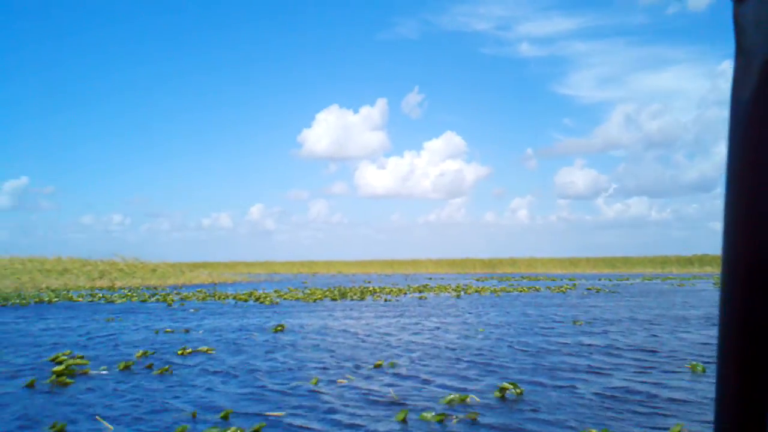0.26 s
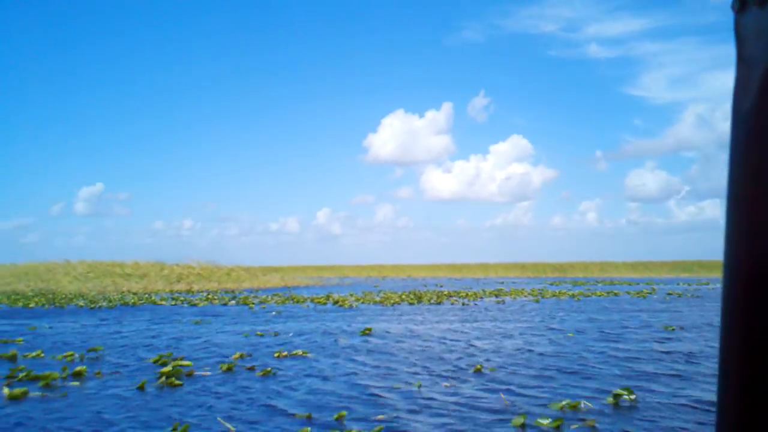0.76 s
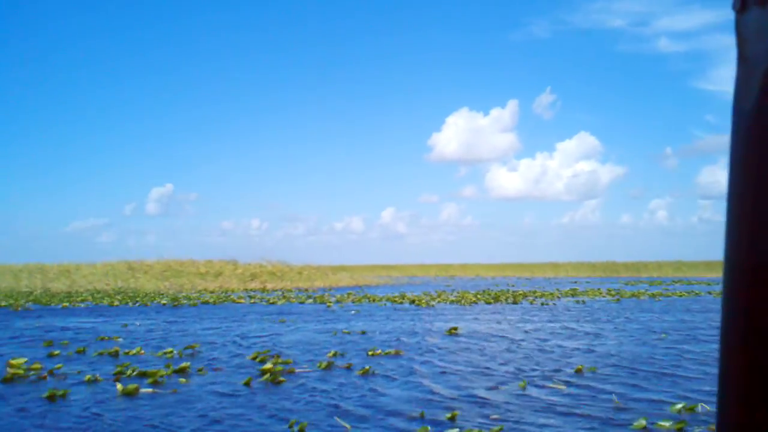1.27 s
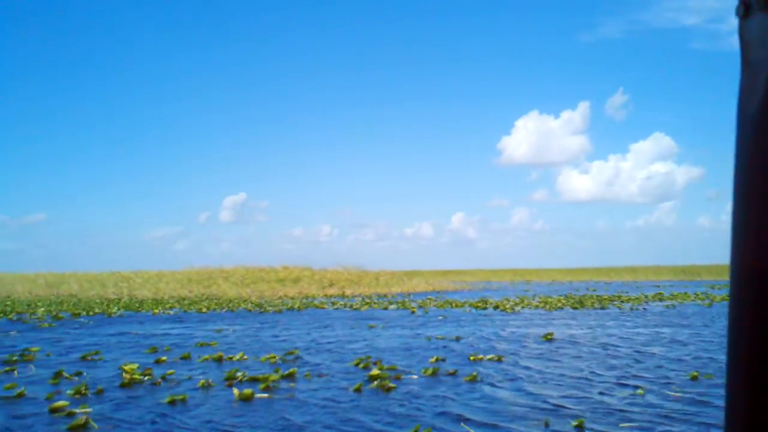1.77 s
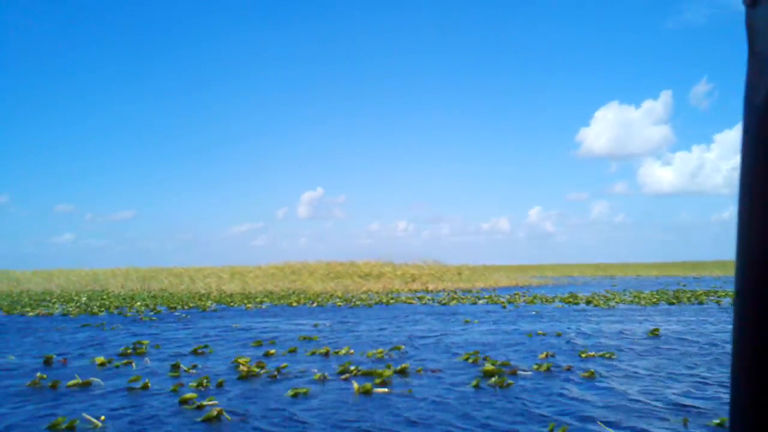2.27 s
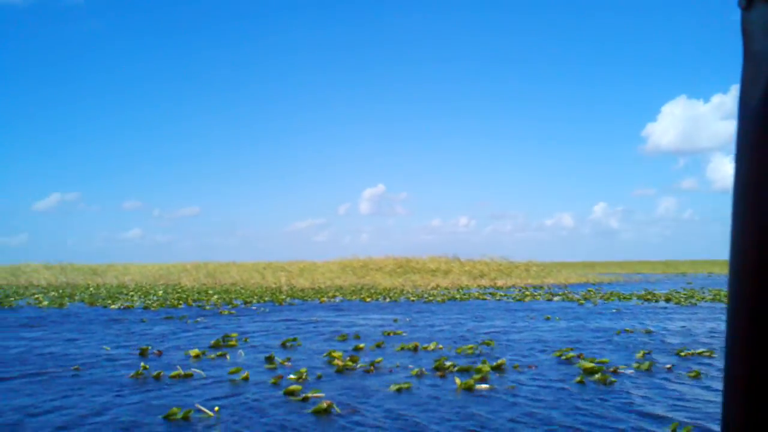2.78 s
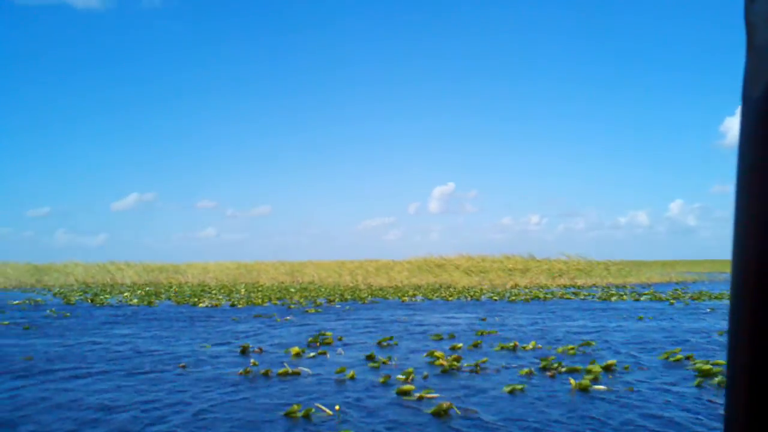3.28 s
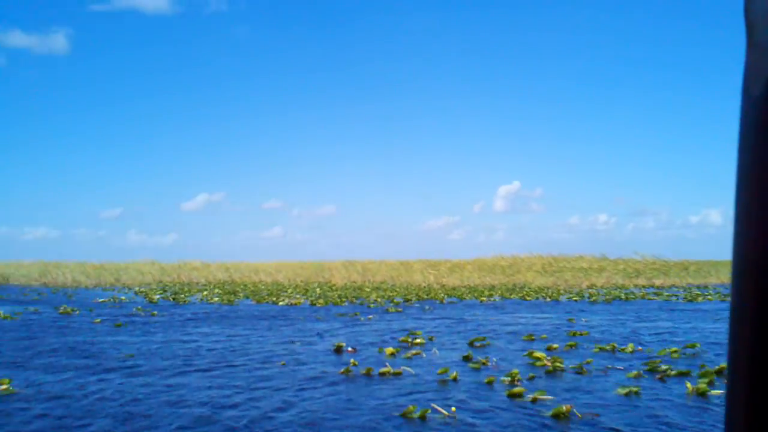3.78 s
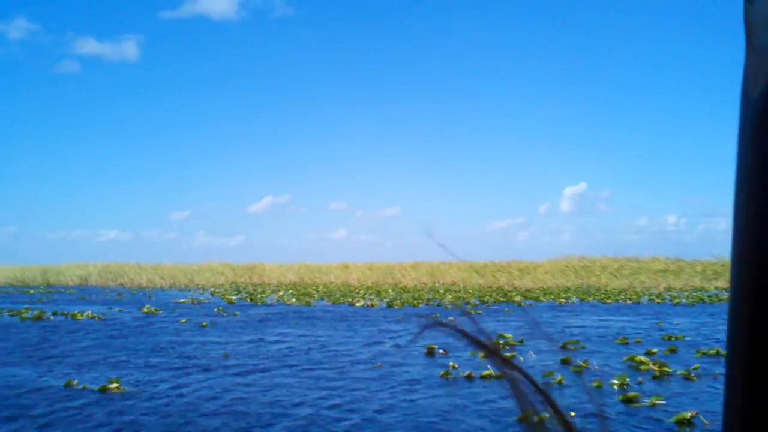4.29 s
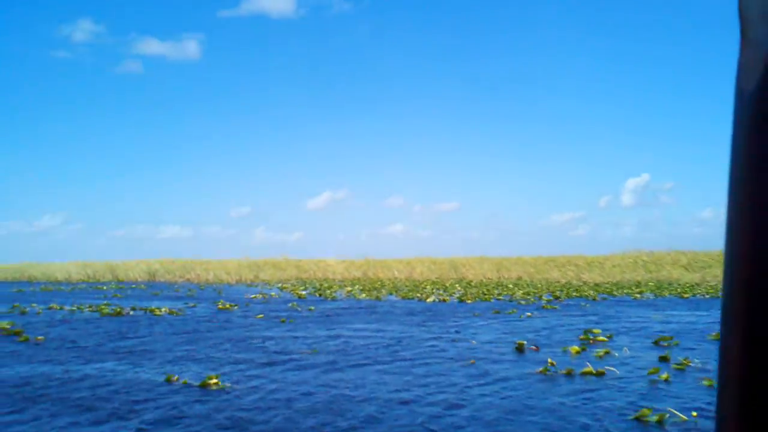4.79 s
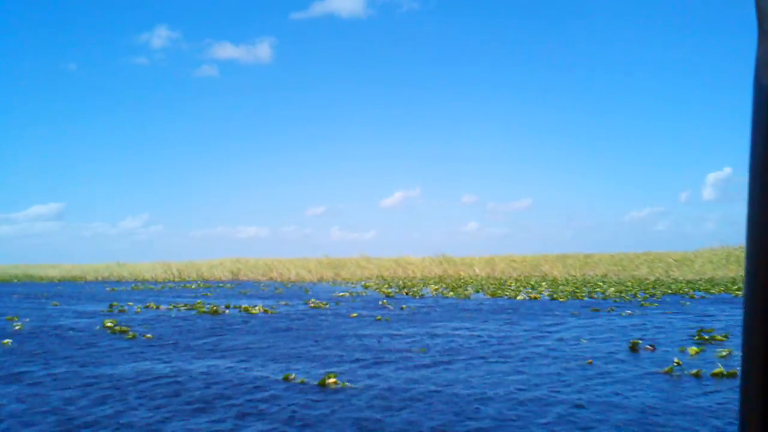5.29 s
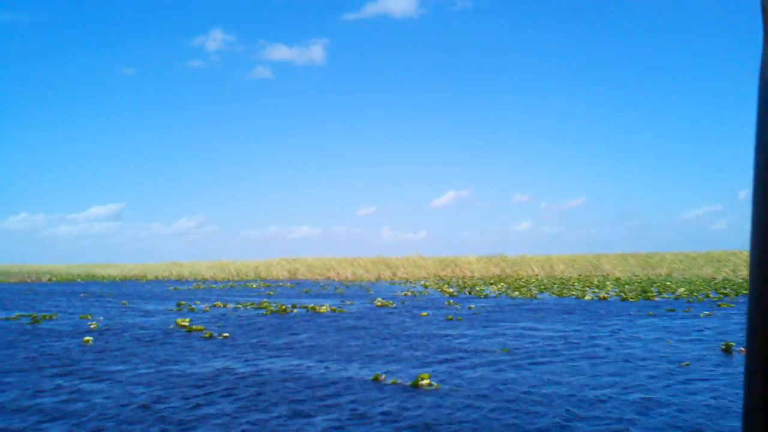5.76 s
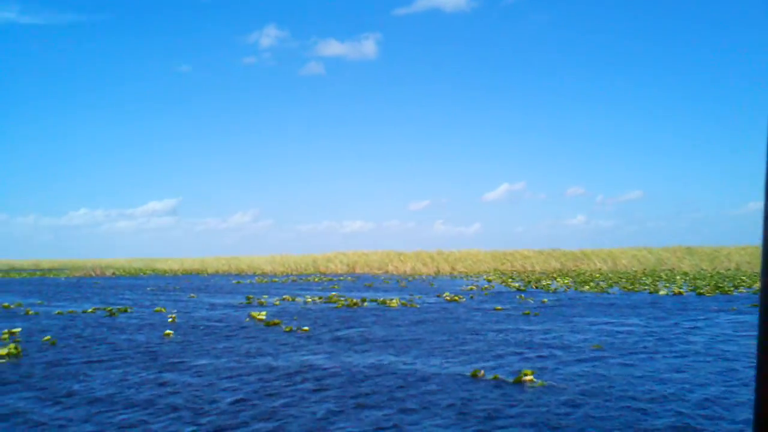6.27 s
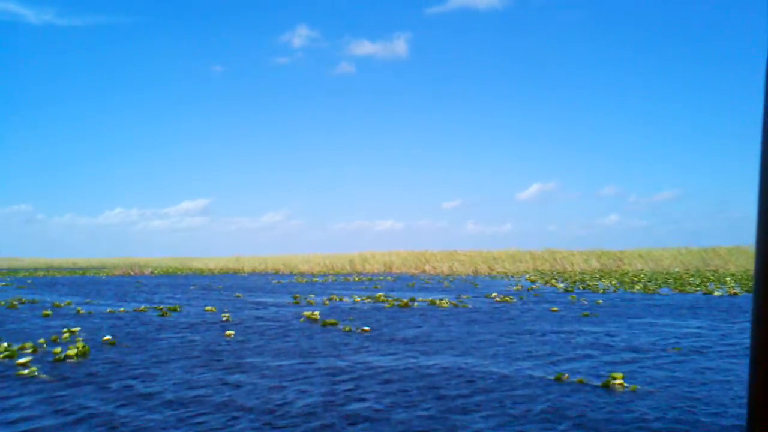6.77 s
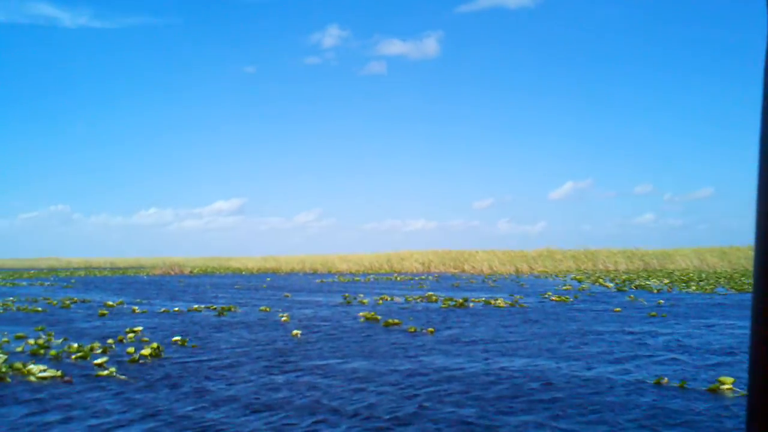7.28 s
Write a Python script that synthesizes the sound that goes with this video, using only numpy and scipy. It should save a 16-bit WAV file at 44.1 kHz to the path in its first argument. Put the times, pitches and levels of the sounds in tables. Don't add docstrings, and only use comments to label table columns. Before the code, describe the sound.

On board an airboat running fast across open marsh, the propeller and engine make a continuous wide droning roar. Blades beat with a raspy exhaust flutter, strongest in the first second, then smoother. Water rushes beneath a rumbling hull with a fine spray hiss. Irregular wind gusts thump the handheld stereo microphone, first on both sides, later mostly on the right.

```python
import sys
import numpy as np
from scipy import signal
from scipy.fft import rfft, irfft, next_fast_len
from scipy.io import wavfile
from scipy.ndimage import uniform_filter1d

SR = 44100
rng = np.random.default_rng(int(sys.argv[2]) if len(sys.argv) > 2 else 0)


def volts_from_decibels(level):
    exponent = np.asarray(level, float) / 20
    return 10 ** exponent


def output_pcm(signal):
    pcm = np.clip(np.atleast_2d(signal).T, -1, 1) * 32767
    wavfile.write(sys.argv[1], SR, np.round(pcm).astype(np.int16))


N = 332514

# (centre [s], half length [s], level [dB], port [0 left, 1 right])
GUSTS = [(0.198, 0.046, -25, 0), (0.766, 0.079, -16.5, 0), (1.59, 0.034, -17, 0), (1.865, 0.15, -18, 0),
         (2.3, 0.13, -24, 0), (2.626, .1, -21, 0), (3.998, .08, -36, 0), (6.522, .1, -27, 0),
         (7.385, 0.064, -20, 0), (0.733, 0.065, -19.5, 1), (1.156, 0.14, -18.5, 1), (1.41, 0.085, -21, 1),
         (1.605, 0.064, -32, 1), (2.395, 0.26, -22, 1), (4.006, .1, -32, 1), (5.637, 0.17, -18.5, 1),
         (5.891, 0.11, -13.5, 1), (6.5, 0.25, -18.5, 1), (7.02, 0.15, -20.5, 1), (7.41, 0.2, -22, 1)]
# (time [s], thump level [dB], snap level [dB], port [0 left, 1 right])
EDDY_HITS = [(0.092, -6, -34, 0), (0.293, -9, -27, 0), (0.353, -4, -33, 0), (0.726, -7, -34, 0),
             (0.748, -5, -20, 1), (1.214, -2, -17.5, 1), (1.253, -2, -15.5, 1), (1.259, 1, -22, 1),
             (1.388, -10, -29, 0), (1.445, -7, -30, 1), (1.564, -4, -24, 0), (1.914, -3.5, -19, 0),
             (1.987, -11, -21.5, 0), (2.209, -4.5, -26, 1), (2.316, -4.5, -28, 0), (2.588, -4.5, -28, 0),
             (3.896, -3.5, -24, 0), (4.434, -14, -22, 0), (4.608, 0.5, -35, 1), (5.303, -10, -21, 1),
             (5.548, -4, -23, 1), (5.639, -0.5, -29, 1), (2.018, -23, -41, 0), (5.948, -19, -25, 1),
             (6.325, -3, -19.5, 1), (6.461, -1, -18.5, 1), (7.326, -24, -26, 1), (7.356, -2, -26, 1),
             (7.373, -9, -22.5, 1), (7.498, -6, -32, 1)]
# (frequency [Hz], density [dB per Hz])
WIND_SPECTRUM = [(20, -38), (45, -39), (90, -6.5), (140, 4.5), (260, 1.5), (350, -0.5), (520, -8.5),
                 (700, -11), (1000, -26.5), (1500, -29), (3000, -57), (9000, -110)]
BREEZE_DB, BREEZE_DB_PER_S = [-25, -28], [-.5, -2]
TICK_OVER_WIND_DB, TICK_SPREAD_DB, TICK_SNAP_DB = 9, 4, -24

# (time [s], propeller wash level [dB], spray level [dB])
WASH_AND_SPRAY = [(0, -31, -59), (.3, -27.5, -56.5), (.6, -25.5, -53.5), (.9, -25, -55), (1.2, -25.5, -57),
                  (1.6, -29, -59), (2.4, -26, -59.7), (3, -24.5, -58), (3.6, -20.5, -54.5),
                  (4.5, -20.5, -54), (5.4, -18.5, -49.5), (5.7, -23, -51), (6.3, -20, -50.5),
                  (6.9, -23, -52.5), (7.2, -20.5, -51.5), (7.54, -25, -53.5)]
# (frequency [Hz], density [dB per Hz])
ROAR_SPECTRUM = [(40, -60), (120, -15), (200, 5), (260, 1), (350, 1.5), (520, -3), (700, -9.5),
                 (1000, -17.5), (1500, -29.5), (3000, -46), (9000, -110)]
RUMBLE_SPECTRUM = [(18, -32), (30, -37), (50, -55), (65, -4), (100, -0.5), (140, 7.5), (200, 4.5),
                   (300, -13.5), (600, -72), (3000, -110)]
RUSH_SPECTRUM = [(300, -8), (700, 5), (1400, -1), (1900, -6), (2300, -2.5), (3000, -9.5), (3700, -9.5),
                 (4500, -15), (5300, -21), (7000, -22), (14000, -62)]
SPRAY_SPECTRUM = [(2100, -9), (4600, -5), (6100, -4.5), (8700, -1), (10600, -4), (13100, -6)]
# (frequency [Hz], shared part [0 to 1])
PORT_LIKENESS = [(50, 1), (400, 0.96), (1000, 0.46), (1600, 0.58), (2500, 0.053), (4000, 0.072)]
LAG_S = .00016
RUSH_DB, RUSH_FOLLOWS, RUSH_FADE_DB_PER_S, SPRAY_MEAN_DB = -42, 0.62, -0.7856, -53.5
HULL_DB, HULL_LOUDEST_S, HULL_SAG_DB_PER_S2 = -32.5, 3.25, -0.5

# (time [s], blade passes [per s])
BLADE_RATE = [
    (0, 71.5),
    (.9, 73.6),
    (1.8, 75.6),
    (2.5, 76.7),
    (3.4, 76.8),
    (5, 77.3),
    (5.55, 79),
    (6.2, 77.3),
    (7.54, 77),
]
# (centre [s], half length [s], multiple of the blade rate [number], level [dB])
BLADE_LOBES = [(0.71, 0.56, 2, -28.5), (2.25, 0.62, 2, -22), (1.52, 0.42, 2, -37.5), (3.4, 0.56, 2, -26.5),
               (4.4, 0.66, 2, -28.5), (5.5, 0.14, 2, -21.5), (3.05, 0.83, 3, -28), (4.6, 0.49, 3, -27.5),
               (6.2, 0.13, 3, -24), (1.18, 0.43, 4, -35), (4.1, 0.31, 4, -31.5), (5.003, 0.24, 4, -25.5),
               (6.05, 0.36, 4, -32)]
# (multiple of the blade rate [number], level [dB])
EXHAUST_TONES = [(3.25, 5), (5, 1.5), (8, -10), (9, -9.5), (10, -23), (12, -31), (13, -18)]
# (frequency [Hz], width [Hz], level [dB])
EXHAUST_RESONANCES = [(711, 150, -3), (930, 200, -5), (1415, 205, -9.5), (1960, 480, -12.5),
                      (2704, 110, -18), (3650, 1180, -25.5)]
# (centre [s], half length [s], level [dB])
SLAP_LOBE = (0.5, .19, -29)
EXHAUST_LOBE = (.56, .36, -31)
HISS_UNDER_SLAP_DB, SLAP_UNDER_WASH_DB, EXHAUST_AWAY_DB = -24, -22, -56

# (frequency [Hz], from left [gain], from right [gain])
PORT_FEED = [(4100, 1, 1), (4350, .15, .45), (14000, .12, .35)]
FEED_S = 1 / 2582
# (frequency [Hz], centre level [dB], side level [dB])
BAND_FLOOR = [(800, -50, -30), (1900, -17, -19), (2750, -12.5, -16), (4000, -14, -11), (4500, -4.6, -7),
              (9000, -6, -6.5), (14000, -3, -4.5)]
EDGE_HZ = 14020
LIMIT = .85


def evened(x):
    return x / np.sqrt(np.mean(x ** 2) + 1e-20)


def read(points, hz):
    f, *values = np.transpose(points)
    return np.squeeze([np.interp(np.log(hz + 1), np.log(f + 1), v) for v in values])


def curves(rows):
    s, *columns = np.transpose(rows)
    return [np.interp(np.arange(N) / SR, s, c) for c in columns]


def lobe(centre, half, db):
    return volts_from_decibels(db) * np.exp(-((np.arange(N) / SR - centre) / half) ** 2)


def wander(hz, channels):
    step = 64
    lowpass = signal.butter(2, hz, fs=SR / step)
    slow = signal.lfilter(*lowpass, rng.standard_normal((channels, N // step + 2)))
    return evened(np.array([np.interp(np.arange(N) / step, np.arange(len(v)), v) for v in slow]))


def resonate(x, hz, width):
    return signal.lfilter(*signal.iirpeak(hz, hz / width, SR), x)


def noise(spectrum, alike, patchy_db):
    frames, hz = N // 256 + 5, np.fft.rfftfreq(1024, 1 / SR)
    a, b, c, d, patches = rng.standard_normal((frames, 513, 5)).T
    patches = uniform_filter1d(patches, size=14, axis=0)
    patches = evened(uniform_filter1d(patches, size=12, axis=1))
    same = np.clip(alike * read(PORT_LIKENESS, hz), 0, 1)[:, None]
    right = a + 1j * b
    late = np.exp(-2j * np.pi * hz * LAG_S)[:, None]
    left = same * late * right + np.sqrt(1 - same ** 2) * (c + 1j * d)
    z = np.array([left, right])
    z *= volts_from_decibels(read(spectrum, hz)[:, None] + patchy_db * patches)
    return evened(signal.istft(z, nperseg=1024, noverlap=768)[1][:, :N])


def wind():
    lumps_db = 2.8 * wander(35, channels=2) + 2.3 * wander(90, channels=2)
    turbulence = evened(volts_from_decibels(lumps_db) * noise(WIND_SPECTRUM, 0, patchy_db=0.96))
    turbulence = signal.lfilter(*signal.butter(2, 55, "high", fs=SR), turbulence)
    power = volts_from_decibels(np.c_[BREEZE_DB] + np.c_[BREEZE_DB_PER_S] * np.arange(N) / SR) ** 2
    for s, half, db, port in GUSTS:
        power[round(port)] += lobe(s, half, db) ** 2
    out = volts_from_decibels(-0.7) * np.sqrt(power) * turbulence

    when, side, strength = rng.random((50, 3)).T
    at = (400 + when * (N - 800)).astype(int)
    port = np.round(side).astype(int)
    tick_db = 10 * np.log10(power[port, at]) + TICK_OVER_WIND_DB + TICK_SPREAD_DB * (2 * strength - 1)
    hits = [*EDDY_HITS, *zip(at / SR, tick_db, tick_db + TICK_SNAP_DB, port)]

    t = np.arange(-400, 400) / SR
    for (s, thump_db, snap_db, port), (phase, size) in zip(hits, rng.random((len(hits), 2))):
        thump_hz = 360 * (.8 + .4 * size)
        thump = np.exp(-(t / .0024) ** 2) * np.cos(2 * np.pi * (thump_hz * t + phase))
        sweep = 950 * t - 60000 * t ** 2
        snap = np.exp(-(t / 0.0022) ** 2) * np.cos(2 * np.pi * (sweep + size))
        front = np.exp(-((t + 0.00022) / 0.00048) ** 2)
        snap += .5 * front * np.cos(2 * np.pi * (1500 * t + phase))
        at = round(s * SR) - 400
        out[round(port), at:at + 800] += volts_from_decibels(thump_db - 4.0) * thump + volts_from_decibels(snap_db + 1.0) * snap
    return out


def hull_and_wash():
    wash_db, spray_db = curves(WASH_AND_SPRAY)
    t = np.arange(N) / SR
    rush_db = RUSH_DB + RUSH_FOLLOWS * (spray_db - SPRAY_MEAN_DB) + RUSH_FADE_DB_PER_S * t
    hull_db = HULL_DB + HULL_SAG_DB_PER_S2 * (t - HULL_LOUDEST_S) ** 2
    swell = wander(8.9, channels=2)
    wash = volts_from_decibels(wash_db - 2.5 + .6 * swell[0]) * noise(ROAR_SPECTRUM, 1, patchy_db=.8)
    hull = volts_from_decibels(hull_db + 9.5) * noise(RUMBLE_SPECTRUM, 1, patchy_db=-1.3)
    rush = volts_from_decibels(rush_db + 1.5 + 0.37 * swell[1]) * noise(RUSH_SPECTRUM, 0.26, patchy_db=1.37)
    spray = noise(SPRAY_SPECTRUM, 0, patchy_db=1.5)
    mist = signal.filtfilt(*signal.butter(2, 10500, "high", fs=SR), spray)
    spray += (volts_from_decibels(0.74 * (spray_db - spray_db.max())) - 1) * mist
    return wash + hull + rush + volts_from_decibels(spray_db + 0.97 + 0.6 * swell[1]) * spray


def propeller():
    rate = curves(BLADE_RATE)[0] * (1 + 0.0019 * wander(5.06, channels=1)[0])
    turns = np.cumsum(rate) / SR
    waver_db = 1.2 * wander(6, channels=10)

    def tone(multiple):
        return np.cos(2 * np.pi * multiple * turns)

    heard = {k: sum(lobe(s, half, db) for s, half, m, db in BLADE_LOBES if round(m) == k)
             for k in (2, 3, 4)}
    blades = sum(gain * volts_from_decibels(waver_db[k - 2]) * tone(k) for k, gain in heard.items())
    blades += heard[4] * volts_from_decibels(waver_db[9] - 8.5) * tone(7)
    exhaust = sum(volts_from_decibels(db + waver_db[k + 3]) * tone(m) for k, (m, db) in enumerate(EXHAUST_TONES))
    steady = np.sqrt(2) * (blades + (lobe(*EXHAUST_LOBE) + volts_from_decibels(EXHAUST_AWAY_DB)) * exhaust)

    puffs = (0.2 + np.exp(-(turns % 1) / 0.45)) * rng.standard_normal((2, N))
    cycle = np.linspace(0, 1, 1025)
    pulse = evened(sum(np.cos(2 * np.pi * k * cycle) for k in range(6, 32)))
    blow = puffs + 0.099 * np.interp(turns % 1, cycle, pulse)
    slap = evened(sum(volts_from_decibels(db) * resonate(resonate(blow, hz, width), hz, width)
                      for hz, width, db in EXHAUST_RESONANCES))
    hiss = volts_from_decibels(HISS_UNDER_SLAP_DB) * resonate(puffs, 6300, 3500)
    near = lobe(*SLAP_LOBE) + volts_from_decibels(curves(WASH_AND_SPRAY)[0] + SLAP_UNDER_WASH_DB)
    near = near * volts_from_decibels(np.array([[-4], [-1.5]]))
    return np.array([np.roll(steady, round(LAG_S * SR)), steady]) + near * (slap + hiss)


def scene():
    return wind() + hull_and_wash() + propeller()


def widen(ports):
    size = next_fast_len(N + 64)
    hz = np.fft.rfftfreq(size, 1 / SR)
    feed = read(PORT_FEED, hz)
    spectra = rfft(ports, size)
    wide = spectra - feed * np.exp(-2j * np.pi * hz * FEED_S) * spectra[::-1]
    wide /= np.sqrt((1 + feed ** 2) / 2)
    return irfft(wide, size)[:, :N]


def empty_weak_bands(x):
    lead = np.zeros((2, 144))
    pair = np.hstack([lead, [x[0] + x[1], x[0] - x[1]]])
    hz, t, z = signal.stft(pair, SR, nperseg=2048, noverlap=1024)
    band = np.cumsum(hz[1] / np.clip(hz / 14, 86, 690)).astype(int)
    starts = np.flatnonzero(np.diff(band, prepend=-1))
    power = np.add.reduceat(abs(z) ** 2, starts, axis=1)[:, band] / np.bincount(band)[band, None]
    shared, own = (evened(uniform_filter1d(rng.standard_normal((count, len(t))), size=4))
                   for count in (1, band[-1] + 1))
    drift_db = 1.1 * shared + .9 * own[band]
    keep = power > volts_from_decibels(read(BAND_FLOOR, hz)[..., None] + drift_db) ** 2 * power[::-1]
    weak_db = np.interp(hz, [3500, 5000, 14000], [-30, -13, -8])[:, None]
    usual = np.sqrt(power.mean(axis=(0, 2))[:, None] * power.mean(axis=0))
    keep &= abs(z) ** 2 > volts_from_decibels(weak_db) ** 2 * usual
    z = z * keep * (hz < EDGE_HZ)[:, None]
    centre, side = signal.istft(z, nperseg=2048, noverlap=1024)[1][:, 144:N + 144]
    return np.array([centre + side, centre - side]) / 2


def roll_off(x):
    return signal.sosfilt(signal.butter(12, 14110, fs=SR, output="sos"), x)


def record(dry):
    limited = LIMIT * np.tanh(widen(dry) / LIMIT)
    mix = empty_weak_bands(limited)
    return roll_off(mix)


dry = scene()
out = record(dry)
output_pcm(out)
```